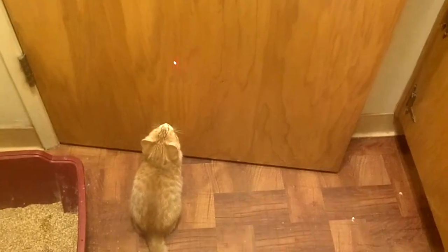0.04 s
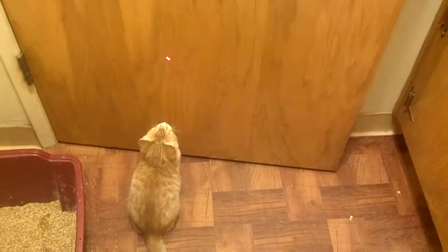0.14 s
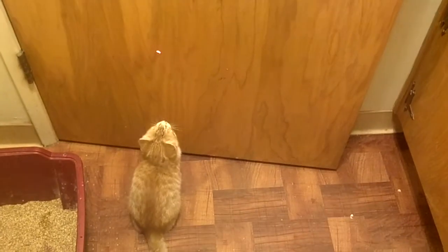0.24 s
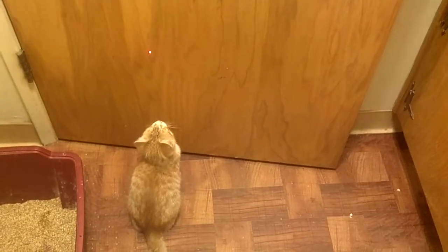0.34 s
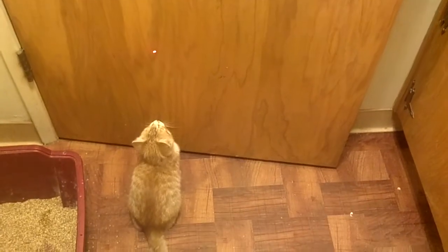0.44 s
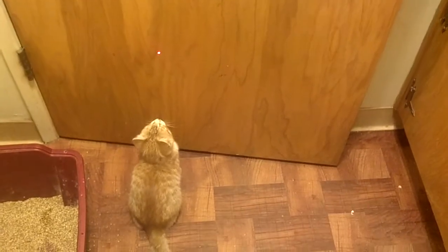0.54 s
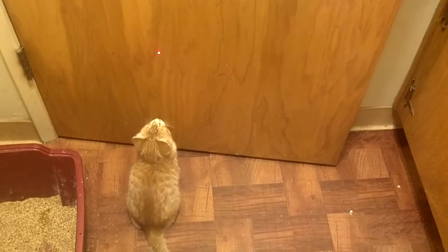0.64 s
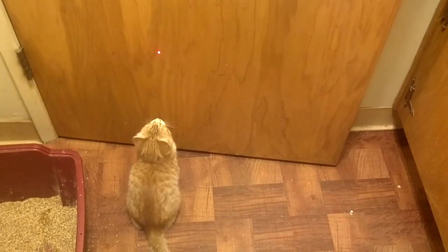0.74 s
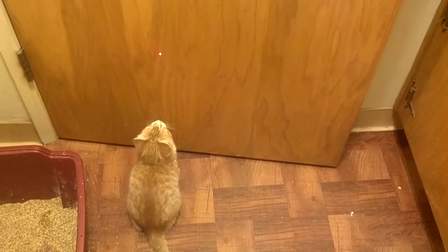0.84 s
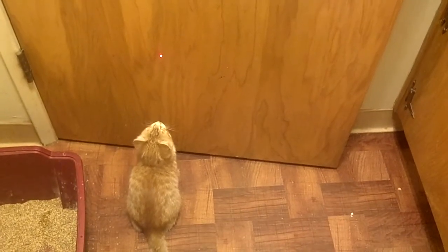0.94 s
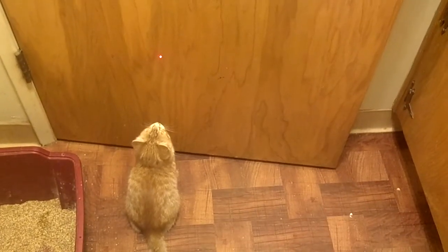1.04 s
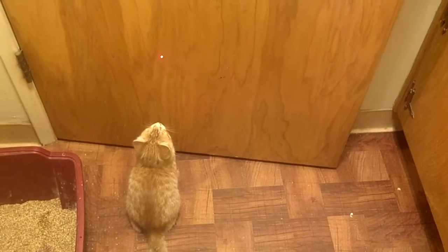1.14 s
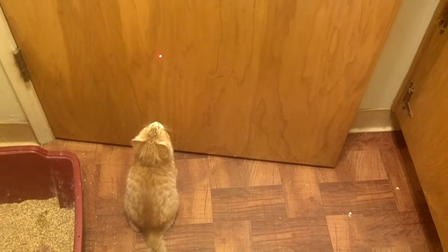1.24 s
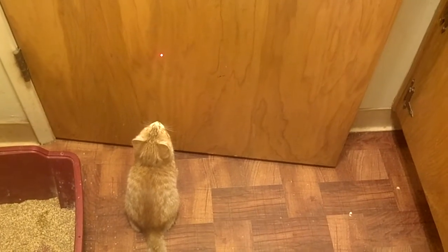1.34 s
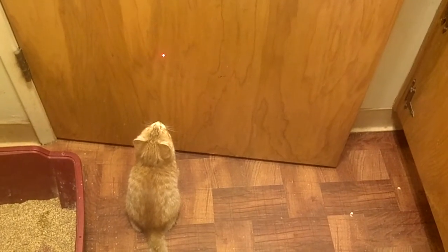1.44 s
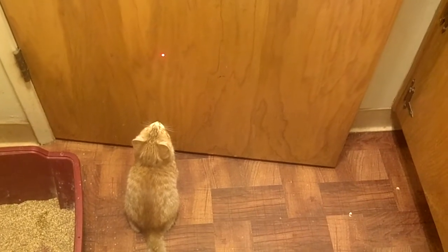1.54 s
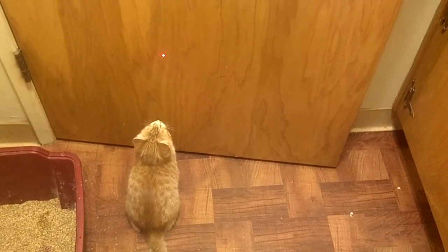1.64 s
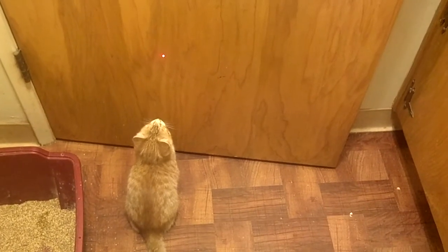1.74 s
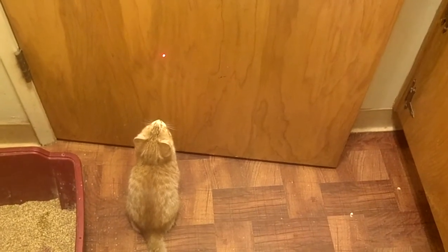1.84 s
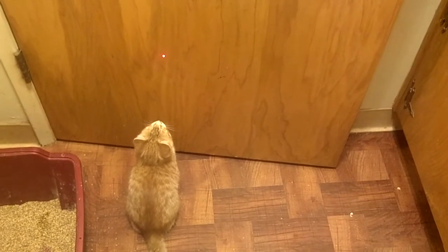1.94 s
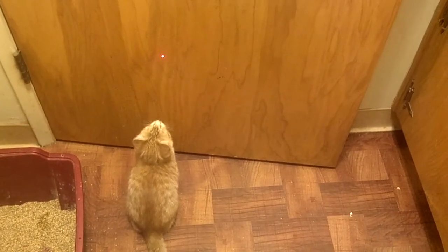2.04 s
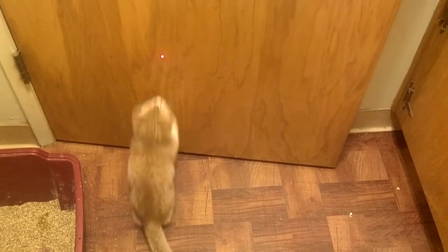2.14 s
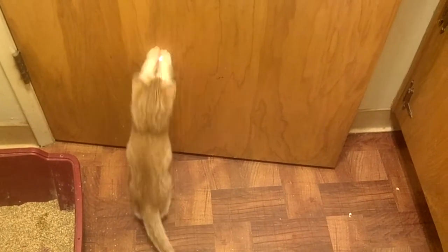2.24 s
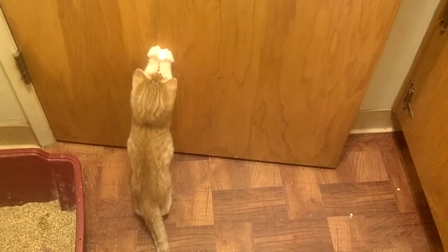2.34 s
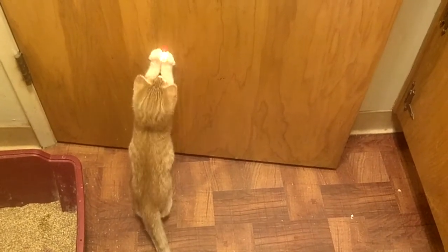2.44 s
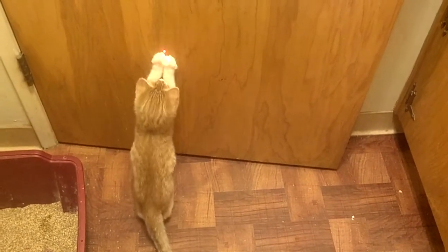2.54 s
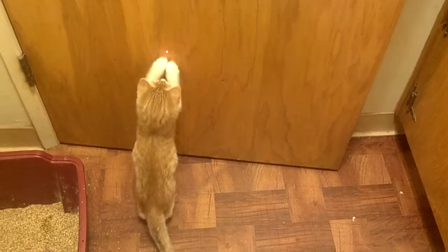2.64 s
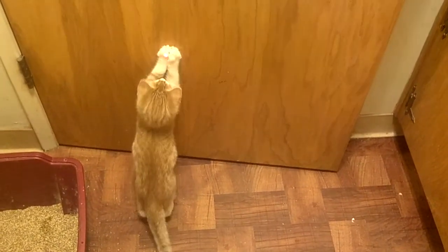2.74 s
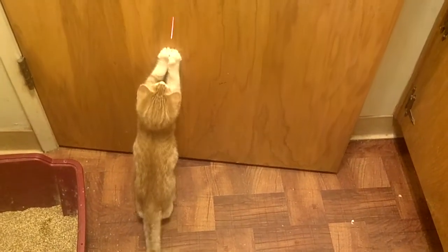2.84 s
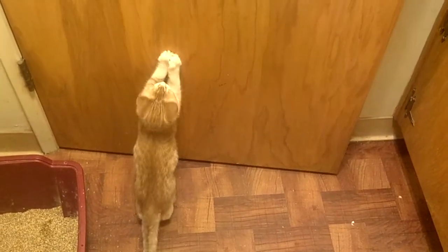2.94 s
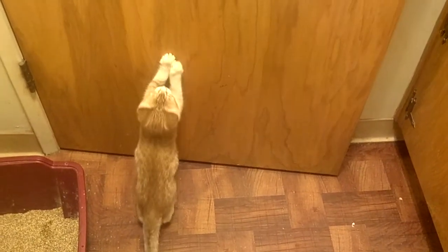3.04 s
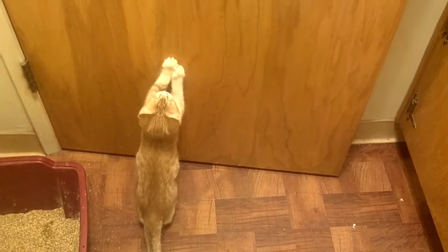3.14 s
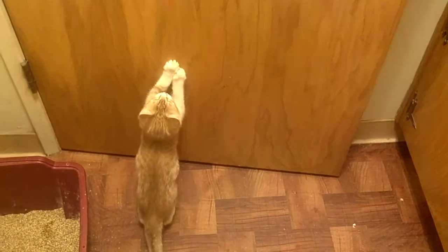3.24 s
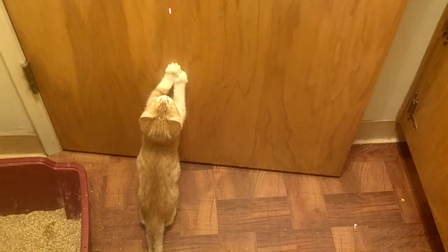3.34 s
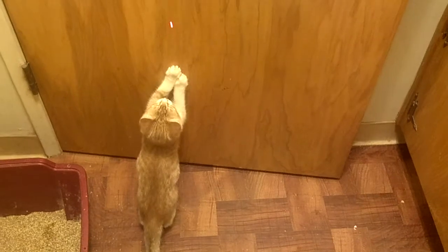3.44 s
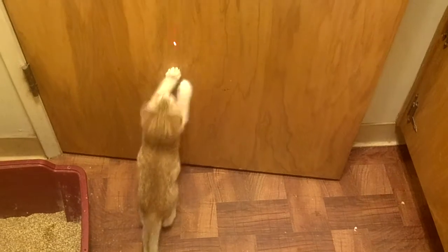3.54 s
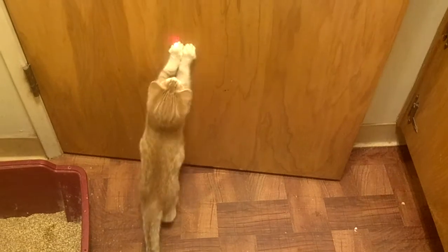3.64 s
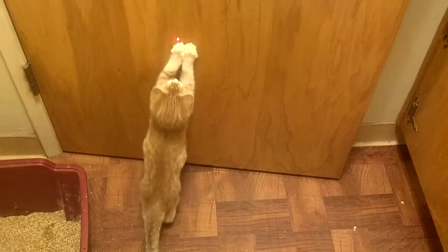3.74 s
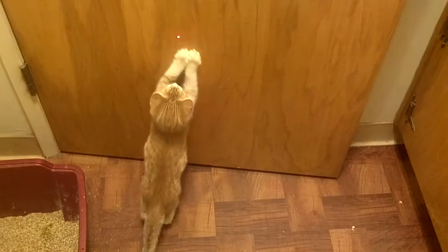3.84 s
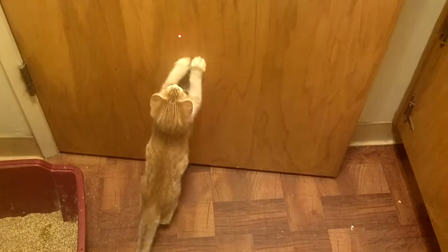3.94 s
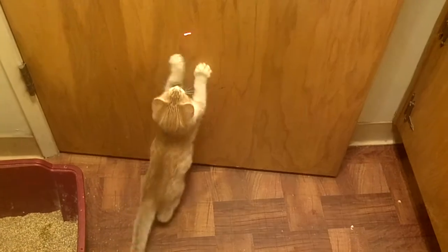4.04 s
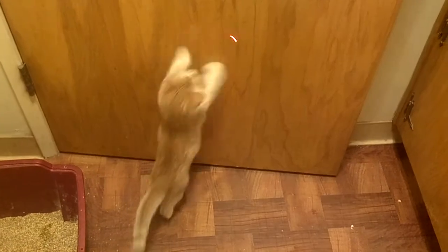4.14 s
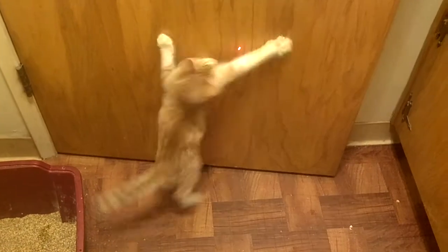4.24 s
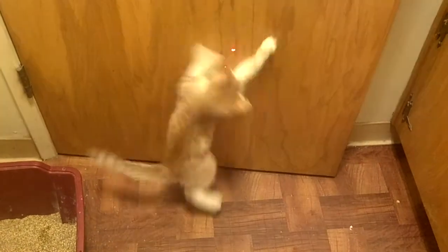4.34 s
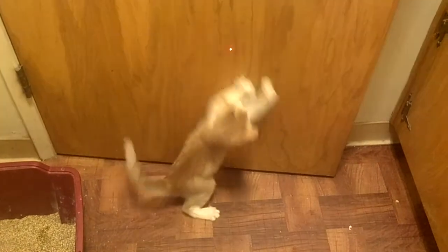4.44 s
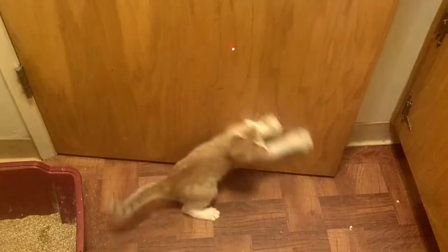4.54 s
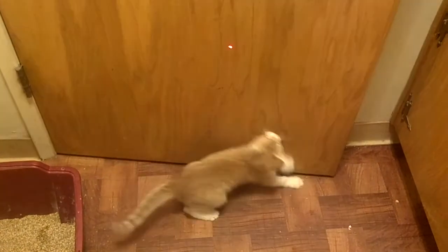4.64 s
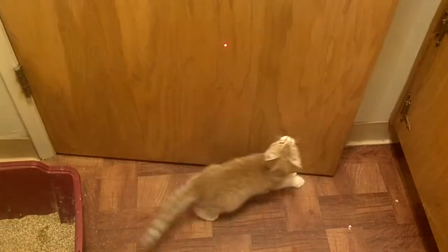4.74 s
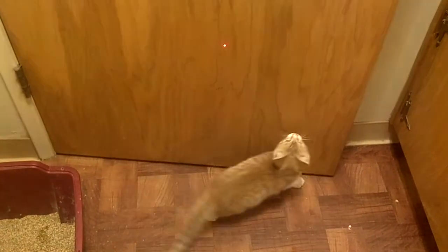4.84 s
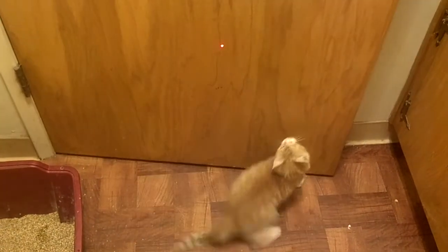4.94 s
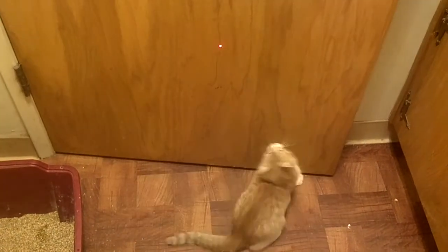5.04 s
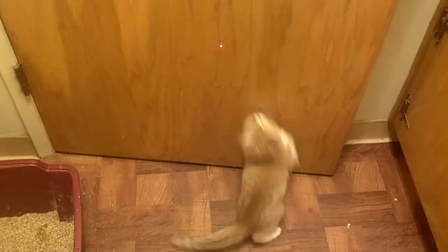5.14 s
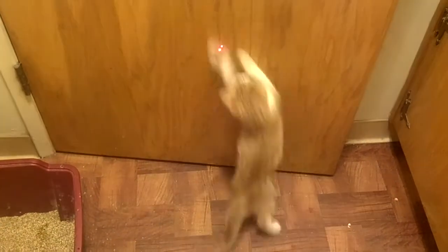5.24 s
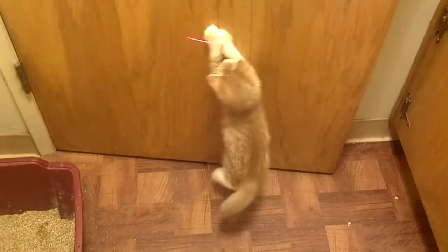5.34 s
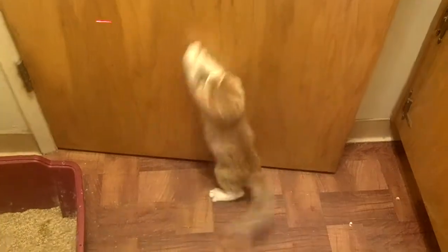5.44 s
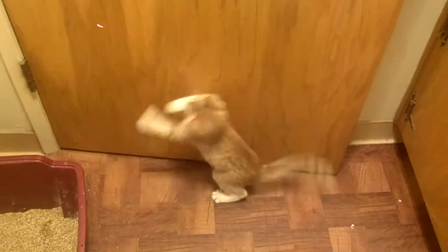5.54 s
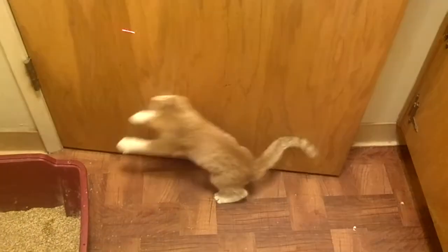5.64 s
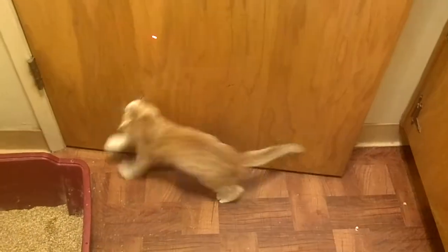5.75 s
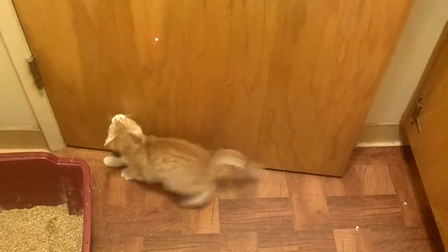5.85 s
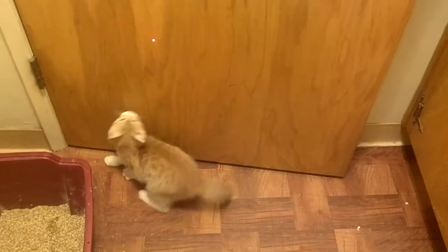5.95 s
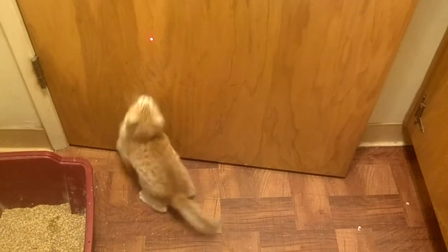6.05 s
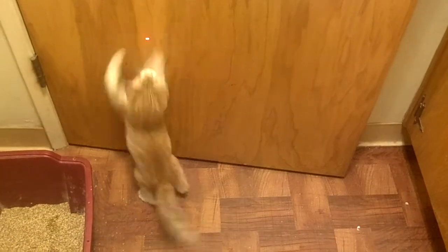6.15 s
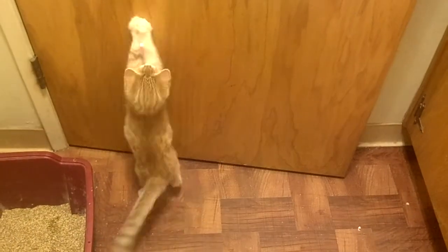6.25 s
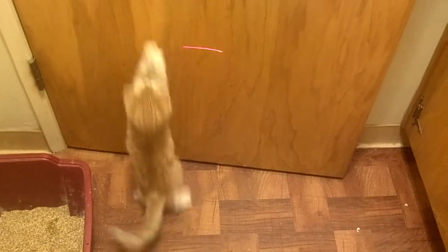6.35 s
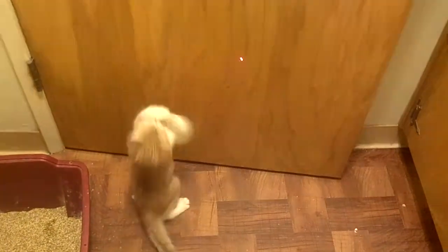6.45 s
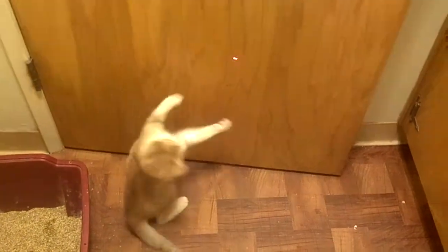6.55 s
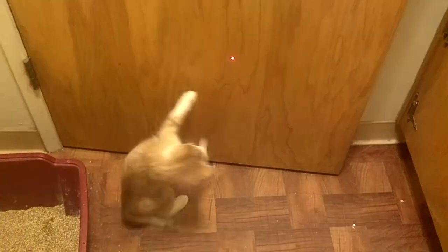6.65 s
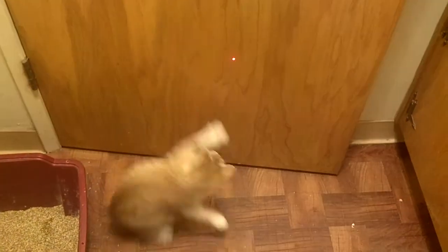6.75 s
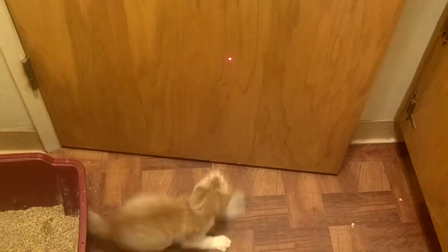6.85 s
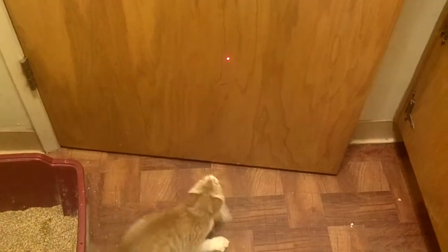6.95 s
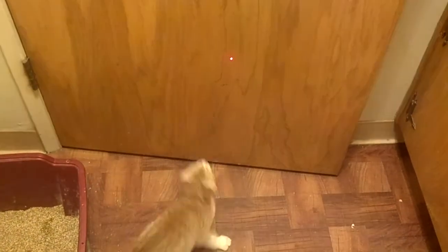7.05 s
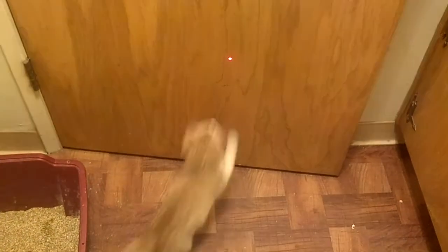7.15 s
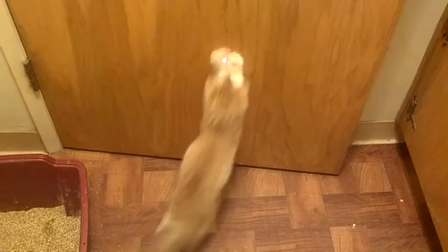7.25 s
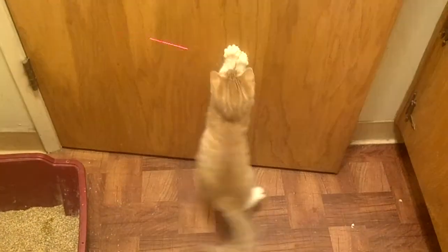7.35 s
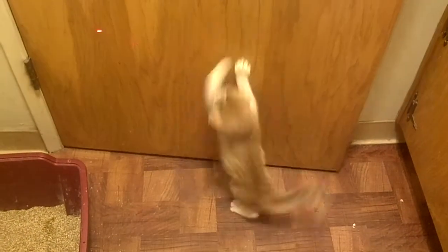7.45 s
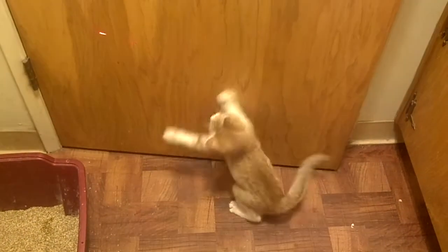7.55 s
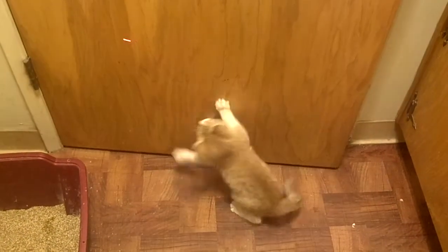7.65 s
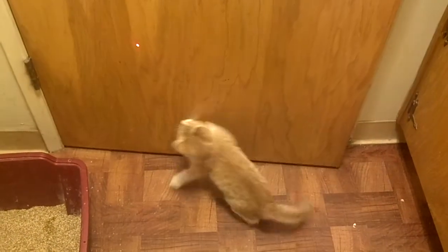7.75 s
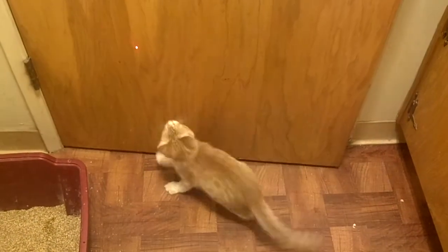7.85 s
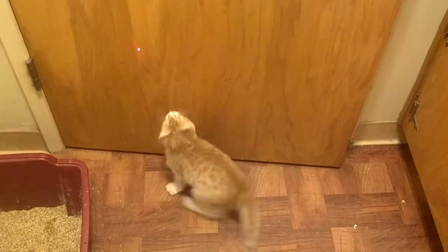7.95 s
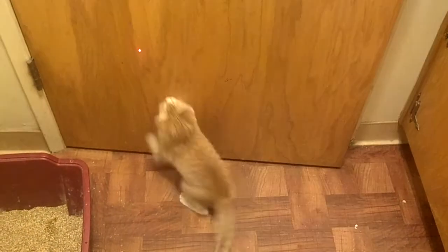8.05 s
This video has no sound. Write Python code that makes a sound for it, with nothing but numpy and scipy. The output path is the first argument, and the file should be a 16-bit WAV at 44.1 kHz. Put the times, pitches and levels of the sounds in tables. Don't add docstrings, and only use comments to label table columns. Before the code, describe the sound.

Over a faint fan drone, soft paws boom against a hollow door, skid hissing down varnish with claw ticks, and land in dull thuds.

```python
import sys
import numpy as np
from scipy import signal
from scipy.fft import rfft, irfft, next_fast_len
from scipy.io import wavfile
from scipy.ndimage import uniform_filter1d, map_coordinates

SR = 44100
rng = np.random.default_rng(int(sys.argv[2]) if len(sys.argv) > 2 else 0)


def master(y):
    cut = np.clip(np.atleast_2d(y).T, -1, 1)
    pcm = np.round(cut * 32767)
    wavfile.write(sys.argv[1], SR, pcm.astype(np.int16))


def undo_db(level):
    steps = np.asarray(level, float) / 20
    return 10 ** steps


N = 357651

# frequency in Hz, level in dB, t60 in seconds.
BOOM_MODES = [(69, -24, 0.49), (94, -13, 0.35), (122.3, -2, 0.4), (150, 1, 0.38), (172.6, -2.5, 0.46),
              (200.6, 0.5, 0.25), (238.8, -8, 0.34)]
# frequency in Hz, level in dB per Hz.
PAD_COLOUR = [(700, -49), (1500, -12.5), (2500, -5.5), (4000, -1), (6000, -1.5), (7800, 3.5), (10000, -5),
              (12500, -12), (16000, -19.5)]
# frequency in Hz, ratio in dB.
PORT_DIFFERENCE = [(40, -1), (80, -5.5), (150, -12.5), (350, -12.5), (700, -7.5), (1200, -5.5),
                   (2000, -0.5), (16000, 0)]


def along(points, hz):
    f, v = np.transpose(points)
    return np.interp(np.log(hz + 1), np.log(f + 1), v)


def unit(x):
    return x / np.sqrt(np.mean(x ** 2) + 1e-20)


def wobble(rate, size=N, order=3):
    knots = rng.standard_normal(int(size * rate / SR) + 4)
    return map_coordinates(knots, [np.arange(size) * rate / SR], order=order)


def filtered(x, response):
    m = next_fast_len(x.shape[-1] + 8192)
    spectrum = rfft(x, m) * response(np.fft.rfftfreq(m, 1 / SR))
    return irfft(spectrum, m)[..., :x.shape[-1]]


def noise(colour, patchy_db, size=N):
    z = signal.stft(rng.standard_normal((2, size + 1024)), nperseg=1024)[2]
    field = uniform_filter1d(rng.standard_normal(z.shape), size=2, axis=1)
    field = uniform_filter1d(field, size=8, axis=2)
    heard = signal.istft(z * undo_db(patchy_db * unit(field)), nperseg=1024)[1][:, :size]
    return unit(filtered(heard, lambda hz: undo_db(along(colour, hz))))


def add(out, s, sound):
    start = round(s * SR)
    out[:, start:start + sound.shape[1]] += sound


def drone():
    # frequency in Hz, level in dB, line width in Hz.
    hum_lines = [(116.5, -74, 1.3), (240.6, -68.5, 3.2), (303.6, -71.5, 8.8), (357, -68.5, 2),
                 (481, -79, 6.1), (556, -76.5, 18), (714, -78, 7), (840, -81.5, 6.2), (8000, -95, 43)]
    # time in seconds, fan rush in dB.
    fan_levels = [(0.0, -50.5), (0.86, -56.5), (1.35, -53.5), (1.81, -55.5), (2.33, -54.5), (2.94, -47.5),
                  (3.77, -53), (3.93, -48), (4.58, -54), (4.77, -58.5), (6.299, -51), (6.75, -58.5),
                  (7.2, -55.5), (8.11, -57.5)]
    # frequency in Hz, level in dB per Hz.
    air_colour = [(30, -46), (70, -1), (130, -3.5), (300, 1), (500, -1), (1000, -11.5), (2400, -13),
                  (4500, -21), (7000, -38.5)]
    hiss_colour = [(2000, -17), (4500, -7.5), (6000, -7), (8000, -4), (12000, -3.5), (16000, 1)]
    t = np.arange(N) / SR

    def lines(hz):
        return sum(undo_db(db) * np.sqrt(2 / (np.pi * width)) * width / (width + 2j * (hz - centre))
                   for centre, db, width in hum_lines)

    hum = filtered(rng.standard_normal((2, N)), lines) * np.sqrt(SR / 2)
    tone_hz, tone_db = 432, -60
    waver = undo_db(2.5 * wobble(9)) * np.exp(0.9j * wobble(6) + [[0], [1.5j]])
    tone = undo_db(tone_db) * np.imag(waver * np.exp(2j * np.pi * tone_hz * t))
    s, rush_db = np.transpose(fan_levels)
    rush = undo_db(np.interp(t, s, rush_db) - 5.0) * noise(air_colour, patchy_db=3.0)
    return hum + tone + rush + undo_db(-64.5) * noise(hiss_colour, patchy_db=3.5)


def dying(colour, t, rise, early_db):
    # frequency in Hz, room t60 in seconds.
    room_decay = [(400, 0.3), (1500, 0.48), (5000, 0.48), (12000, 0.28)]
    hz, s, z = signal.stft(noise(colour, patchy_db=2.2, size=len(t)), SR, nperseg=128)
    fade = undo_db(-60 * s / along(room_decay, hz)[:, None])
    tail = signal.istft(z * fade, SR, nperseg=128)[1][:, :len(t)]
    burst = 1 + undo_db(early_db - 60 * t / 0.011)
    return tail * burst * (1 - np.exp(-t / rise))


def modes(table, t, rise):
    out = np.zeros((2, len(t)))
    for hz, db, t60 in table:
        size = undo_db(db + rng.normal(0, 2.03, (2, 1)))
        phase = rng.uniform(0, 2 * np.pi, (2, 1))
        flutter = undo_db(3 * wobble(30, size=len(t), order=1))
        out += size * flutter * undo_db(-60 * t / t60) * np.sin(2 * np.pi * hz * t + phase)
    return out * (1 - np.exp(-t / rise))


def bumps(events, rise):
    # frequency in Hz, level in dB, t60 in seconds.
    board_modes = [(293.6, -8, 0.22), (324, 8, 0.05), (361.5, 0, 0.24), (421, -15, 0.15)]
    hollow_modes = [(463, -1, 0.2), (570, 3, 0.076), (657, -13, 0.39)]
    plank_modes = [(812, -1, 0.18), (853, 2, 0.16), (1070, -24, 0.13), (1224, -13, 0.12), (1287, -4, 0.27)]
    # frequency in Hz, level in dB per Hz.
    thud_colour = [(300, -18), (480, 5), (800, 5), (1300, -8.5), (1900, -10), (4000, -31.5), (8000, -36)]
    out, t = np.zeros((2, N + SR)), np.arange(SR * 3 // 5) / SR
    for s, boom_db, thud_db, hollow_db, knock_db in events:
        hit = undo_db(boom_db - 7.5) * modes(BOOM_MODES, t, rise + 0.0094)
        hit += undo_db(thud_db - 4.5) * modes(board_modes, t, rise)
        hit += undo_db(hollow_db - 8.0) * modes(hollow_modes, t, rise)
        hit += undo_db(knock_db - 12.5) * modes(plank_modes, t, rise)
        hit += undo_db(knock_db - 2.5) * dying(thud_colour, t, rise, early_db=16)
        add(out, s - 0.002, hit)
    return out[:, :N]


def far_bumps():
    # start in seconds, then boom, thud, hollow and knock levels in dB.
    far_events = [
        (0.049, -65, -72, -53, -62),
        (1.149, -74, -43, -34.5, -43),
        (1.222, -64, -47, -39, -47),
        (1.548, -65.5, -60.5, -69, -52.5),
    ]
    return bumps(far_events, rise=0.023)


def slide():
    # start in seconds, hiss in dB,
    # share passed into the wood in dB, fade in dB/s.
    skids = [(2.349, -32, -5, 184), (2.798, -27, -10, 260), (3.64, -55, -19, 192),
             (3.705, -31.5, -9.5, 200), (4.238, -43.5, 1.5, 303), (4.334, -26, -9.5, 128),
             (5.353, -28.5, -13, 157), (5.912, -62.5, -11, 33), (6.19, -57, -12, 264),
             (6.289, -22.5, -16.5, 296), (6.602, -59.5, -2, 200), (6.698, -66.5, -4, -4),
             (6.879, -55, -3, 245), (6.966, -49, -9, 200), (7.334, -30, -8, 127), (7.63, -35, -30, 130),
             (7.995, -58.5, -18, 124)]
    # full pressure in seconds, hold in seconds,
    # hiss in dB, share passed into the wood in dB, fade in dB/s.
    drags = [(0.247, 0.076, -56.5, 0, 130), (2.514, 0.26, -52.5, -8, 350), (2.89, 0.013, -49.5, -7, 59),
             (3.17, .01, -51.5, -1, 50), (3.884, 0.31, -40.5, -4.5, 130), (4.537, 0.054, -34.5, -37, 200),
             (4.607, 0.071, -34.5, -14.5, 155), (5.07, .01, -60, -15, 122), (5.33, .02, -66, -6, 300),
             (6.37, .01, -54, -1.5, 82), (6.991, 0.012, -45, -34, 98), (7.374, 0.016, -31.5, -30, 117),
             (7.546, 0.012, -35.5, -20, 197), (7.621, .01, -29, -33, 133), (8.11, 0.011, -63, -13.5, 96)]
    # frequency in Hz, width in Hz, level in dB.
    grain_modes = [(1015, 173, 0.5), (1620, 110, -3), (2556, 370, 3), (3440, 175, 0), (4250, 940, -5)]
    skid_rise, drag_rise = 8000, 580
    wood_lingers = 0.82
    t, hiss, wood = np.arange(N) / SR, np.zeros(N), np.zeros(N)
    strokes = [(s, 0, *rest, skid_rise) for s, *rest in skids]
    strokes += [(*row, drag_rise) for row in drags]
    for s, hold, db, wood_db, fade, rise in strokes:
        near = slice(max(round((s - 0.25) * SR), 0), round((s + 1.5) * SR))
        coming = rise * np.maximum(s - t[near], 0)
        gone = fade * np.maximum(t[near] - s - hold, 0)
        hiss[near] += undo_db(2 * (db - 5.5 - coming - gone))
        wood[near] += undo_db(2 * (db + wood_db - coming - wood_lingers * gone))

    def body(hz):
        return sum((-1) ** k * undo_db(db) * 1j * hz * width / (centre ** 2 - hz ** 2 + 1j * hz * width)
                   for k, (centre, width, db) in enumerate(grain_modes))

    grit = undo_db(0.57 * wobble(40) + 0.41 * wobble(400))
    bright = np.sqrt(hiss) * noise(PAD_COLOUR, patchy_db=4.5)
    dull = np.sqrt(wood) * unit(filtered(rng.standard_normal((2, N)), body))
    return grit * (bright + dull)


def claws():
    # start in seconds, peak in dB, pitch in Hz.
    ticks = [(.878, -53, 10500), (.968, -54, 9000), (2.3495, -33, 3330), (2.795, -28.5, 7730),
             (2.8012, -33.5, 8600), (2.8025, -21.5, 3980), (2.8095, -24, 8100), (2.8158, -25, 8000),
             (3.0974, -51, 3360), (3.161, -39, 3070), (3.703, -25, 7900), (3.712, -33, 3460),
             (4.331, -20, 7930), (4.3328, -13.5, 8750), (4.592, -24, 8440), (5.0684, -49, 6920),
             (5.3575, -28, 9100), (5.909, -50, 3500), (6.2828, -43, 3920), (6.5984, -51.5, 3150),
             (6.8781, -64, 3270), (6.997, -41, 6000), (7.2125, -50, 7860), (7.3337, -32, 4250),
             (7.6223, -18.5, 8280)]
    out, t = np.zeros((2, N + SR)), np.arange(SR // 100) / SR
    for s, db, hz in ticks:
        ring = np.sin(2 * np.pi * hz * t + rng.uniform(0, 2 * np.pi, (2, 1)))
        crack = 0.096 * rng.standard_normal((2, len(t)))
        shape = undo_db(db - 3.5 - 60 * t / 0.014) * (1 - np.exp(-t / 0.0001))
        add(out, s - 0.0005, shape * (ring + crack))
    return out[:, :N]


def paws():
    # start in seconds, then panel boom, door ring, wood knock and pad slap levels in dB.
    contacts = [(2.351, -25, -34.5, -30, -43), (2.796, -31, -35.5, -29.5, -26.5),
                (3.17, -50, -42.5, -42.5, -69), (3.703, -24.5, -26.5, -31.5, -27),
                (4.239, -62, -63, -48, -47), (4.308, -30.5, -34.5, -38, -39), (4.332, -51, -28.5, -35, -22),
                (5.316, -38, -43, -57, -54.5), (5.356, -28.5, -26, -28.5, -23.5),
                (6.184, -41.5, -35.5, -62, -53), (6.278, -64, -58, -35.5, -35),
                (6.291, -26.5, -29, -28, -29.5), (7.331, -24, -27.5, -28, -34), (7.62, -52, -72, -71, -30)]
    # frequency in Hz, level in dB, t60 in seconds.
    cavity_modes = [(285.6, -6.5, 0.22), (309, -17, 0.5), (335, -9, 0.39), (361.6, 4.5, 0.33),
                    (429, -7, 0.17)]
    veneer_modes = [(557, -13, 0.15), (714, -3.5, 0.4), (794, 0, 0.3), (1037, -12, 0.47), (1378, -15, 0.69),
                    (1488, -9.5, 0.52)]
    # frequency in Hz, level in dB per Hz.
    knock_colour = [(300, -8.5), (480, 8), (800, 0.5), (1200, -7.5), (2000, -8.5), (4000, -41), (8000, -22)]
    rise = 0.0088
    out, t = np.zeros((2, N + SR)), np.arange(SR * 3 // 5) / SR
    for s, boom_db, ring_db, knock_db, slap_db in contacts:
        hit = undo_db(boom_db - 7.0) * modes(BOOM_MODES, t, rise)
        hit += undo_db(ring_db - 7.0) * modes(cavity_modes, t, rise)
        hit += undo_db(knock_db - 6) * dying(knock_colour, t, rise, early_db=10)
        hit += undo_db(knock_db - 12.5) * modes(veneer_modes, t, rise)
        hit += undo_db(slap_db - 6.5) * dying(PAD_COLOUR, t, 0.41 * rise, early_db=-24)
        edge = np.diff(rng.standard_normal((2, len(t) + 1)))
        hit += undo_db((slap_db + knock_db) / 2 - 14 - 60 * t / 0.06) * edge
        add(out, s - 0.002, hit)
    return out[:, :N]


def landings():
    # start in seconds, then boom, thud, hollow and knock levels in dB.
    drops = [
        (4.548, -37, -53, -64, -71),
        (4.598, -37.5, -33.5, -35, -29),
        (5.709, -50.5, -38, -53, -37),
        (5.909, -58, -48.5, -47, -48.5),
        (6.88, -56, -56, -62, -51),
        (6.965, -33, -18.5, -21, -34.5),
        (6.987, -65, -15, -35, -60),
        (7.07, -67, -36, -39, -68),
        (8.08, -55, -54, -56, -58),
        (7.343, -52, -25.5, -32, -51),
    ]
    return bumps(drops, rise=0.0032)


def scene():
    # frequency in Hz, share.
    right_share = [(300, 0.48), (1200, -0.086), (2200, 0.088), (9000, 0.34), (11500, -0.018), (16000, -0.2)]
    both, other = drone() + far_bumps() + slide() + claws() + paws() + landings()

    def near(hz):
        return np.clip(along(right_share, hz), -0.9, 0.9)

    differ = filtered(other, lambda hz: np.sqrt(1 - near(hz) ** 2)) - filtered(both, near)
    differ = filtered(differ, lambda hz: undo_db(along(PORT_DIFFERENCE, hz)))
    return np.array([both + differ, both - differ])


def masked(x, under_db, treble_db):
    mid_side = np.array([x[0] + x[1], x[0] - x[1]]) / 2
    hz, _, z = signal.stft(mid_side, SR, nperseg=1024)
    power = uniform_filter1d(abs(z) ** 2, size=3, axis=1)
    around = uniform_filter1d(power.sum(0), size=70, axis=0)
    limit_db = under_db + treble_db * np.clip((hz - 8000) / 4000, 0, 1)
    limit = undo_db(2 * limit_db)[:, None] * around
    limit[hz < 1900] = 0
    mid, side = signal.istft(z * (power > limit), SR, nperseg=1024)[1][:, :N]
    return np.array([mid + side, mid - side])


def top_cut(x):
    return signal.sosfilt(signal.butter(12, 16980, fs=SR, output="sos"), x)


def record(dry):
    # frequency in Hz, share.
    steering_depth = [(3500, 0.82), (4850, 0.61), (5600, 0.24), (6550, 0.69), (7500, 0.35), (8700, 0.11),
                      (10500, .15), (12800, 0.16), (16000, 0.2)]
    # frequency in Hz, delay in cycles.
    steering_delay = [(0, 0), (1250, .5), (2230, .95), (2640, 1.05), (3650, 1.5), (4850, 2), (6550, 2.5),
                      (7500, 3), (9800, 4), (15400, 6)]
    # frequency in Hz, left over right in dB.
    housing_shadow = [(100, 3.5), (250, 0.5), (3000, -0.5), (5700, -3.5), (7700, 9), (9500, 4.5),
                      (12000, -1.5)]

    def late(hz):
        cycles = np.interp(hz, *np.transpose(steering_delay))
        return np.clip(along(steering_depth, hz), 0, 1) * np.exp(-2j * np.pi * cycles)

    def flatten(hz):
        loss = np.hypot(abs(1 - late(hz)), undo_db(along(PORT_DIFFERENCE, hz)) * abs(1 + late(hz)))
        shadow_db = np.outer([0.5, -0.5], along(housing_shadow, hz))
        return np.sqrt(2) * undo_db(shadow_db - 20 * (hz > 15950)) / loss

    steered = dry - filtered(dry[::-1], late)
    flat = filtered(steered, flatten)
    return top_cut(masked(flat, under_db=-16.5, treble_db=8.0))


dry = scene()
out = record(dry)
master(out)
```